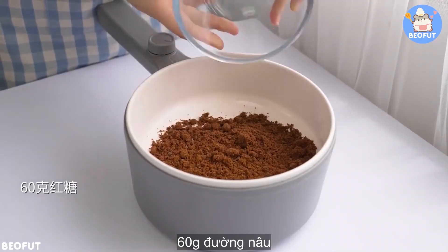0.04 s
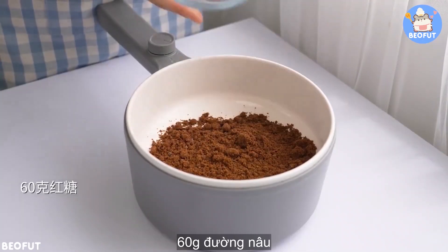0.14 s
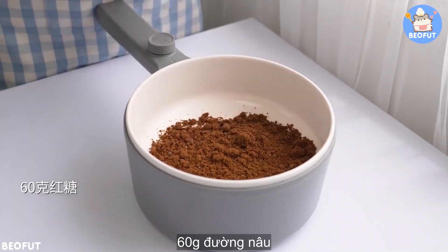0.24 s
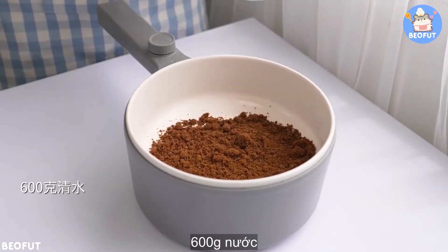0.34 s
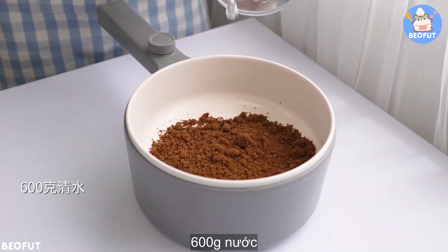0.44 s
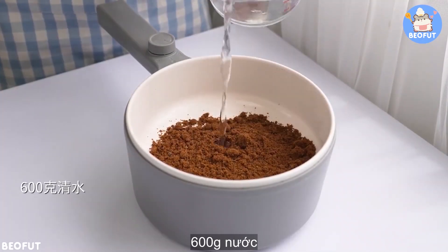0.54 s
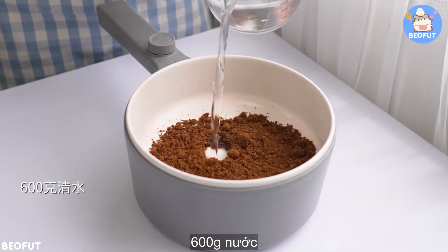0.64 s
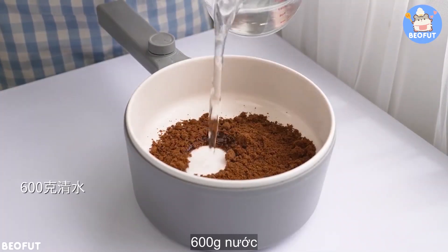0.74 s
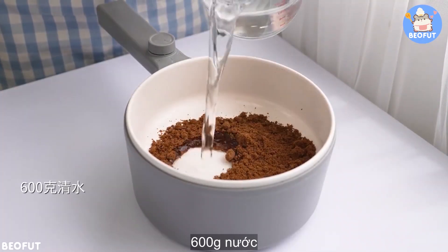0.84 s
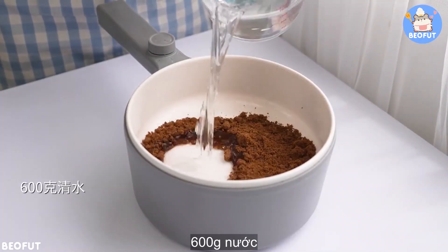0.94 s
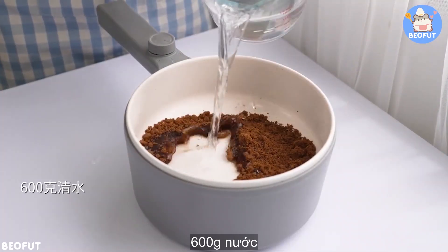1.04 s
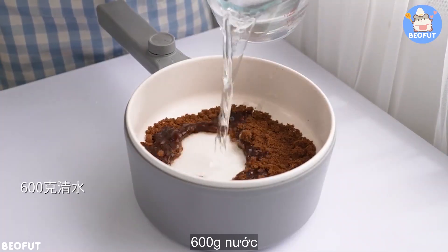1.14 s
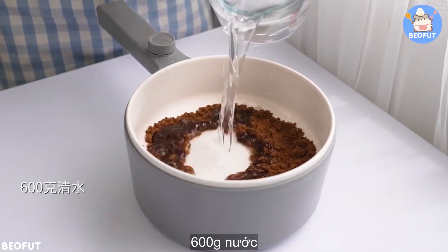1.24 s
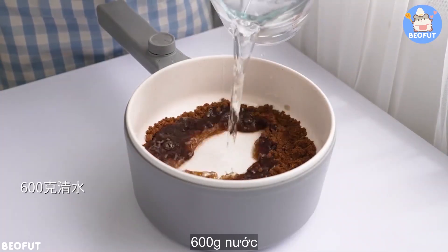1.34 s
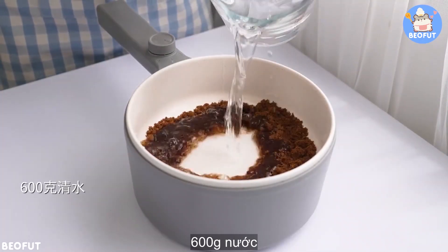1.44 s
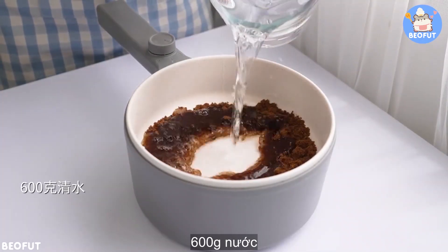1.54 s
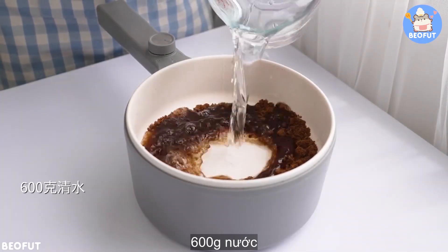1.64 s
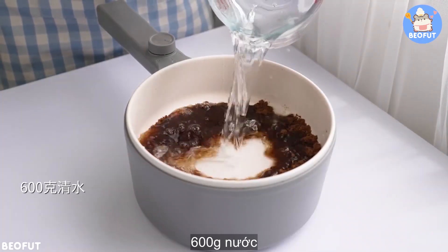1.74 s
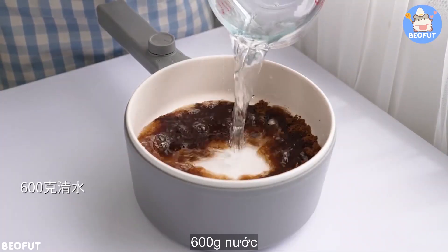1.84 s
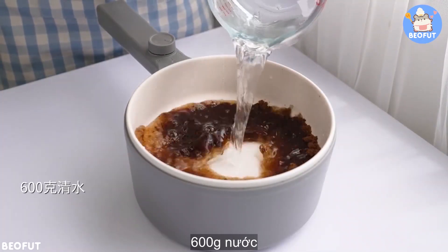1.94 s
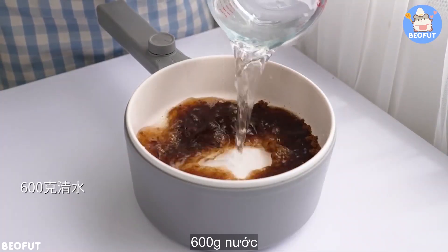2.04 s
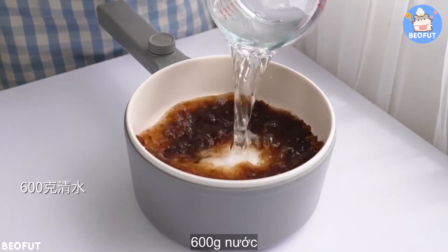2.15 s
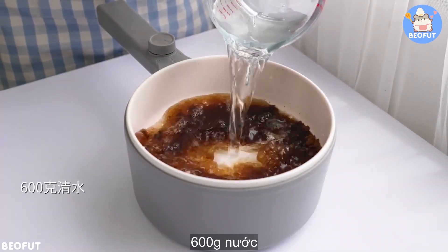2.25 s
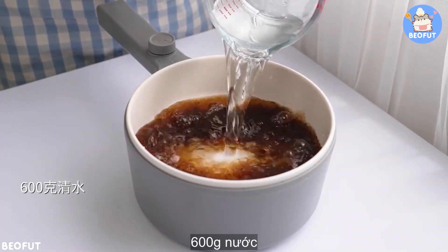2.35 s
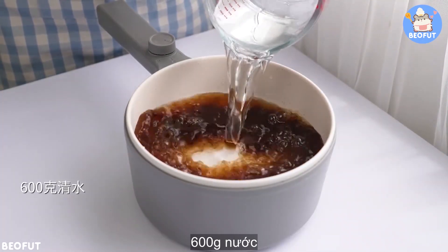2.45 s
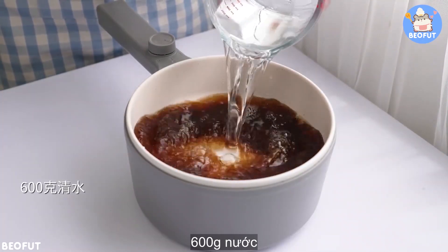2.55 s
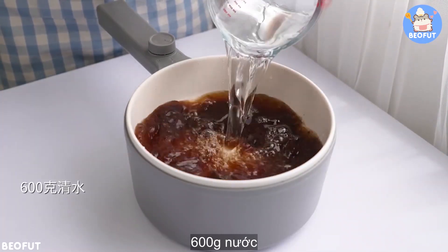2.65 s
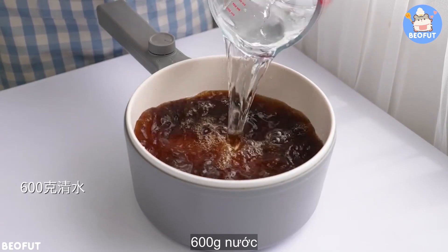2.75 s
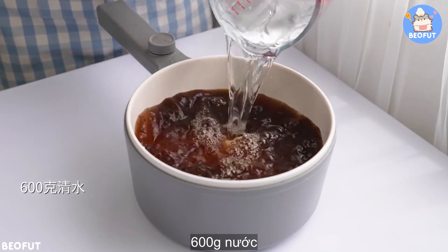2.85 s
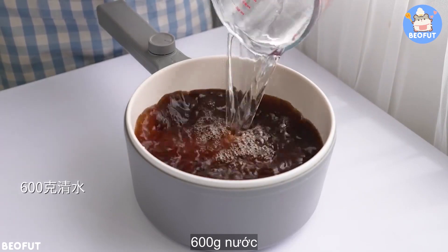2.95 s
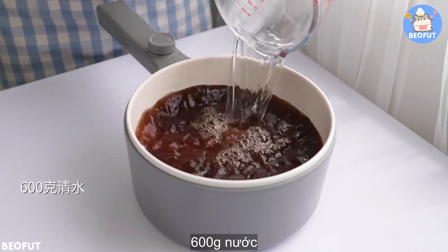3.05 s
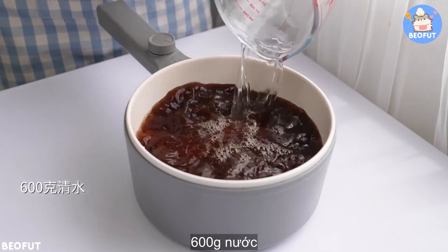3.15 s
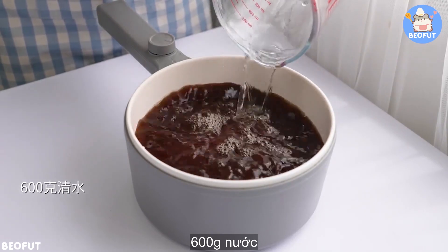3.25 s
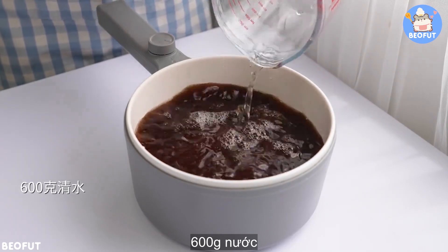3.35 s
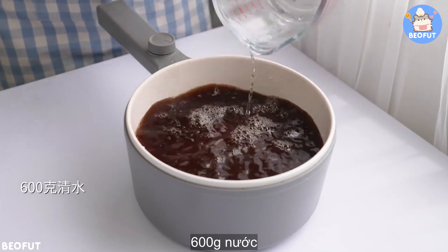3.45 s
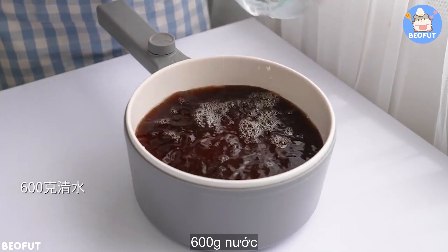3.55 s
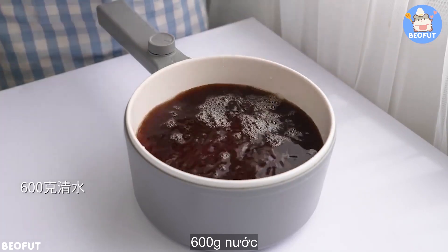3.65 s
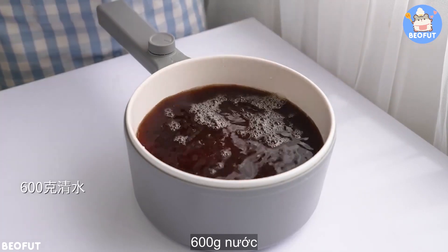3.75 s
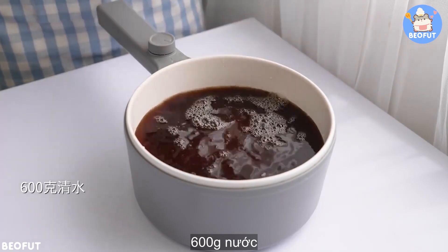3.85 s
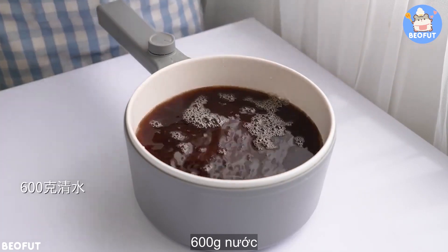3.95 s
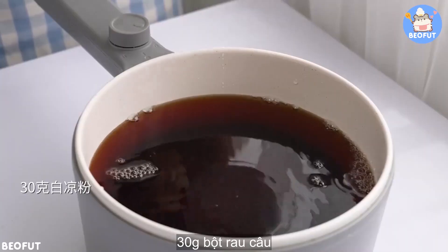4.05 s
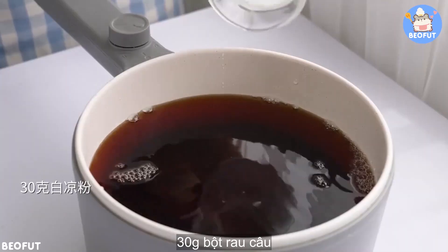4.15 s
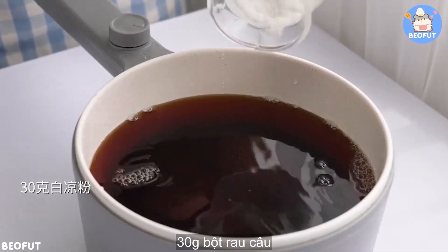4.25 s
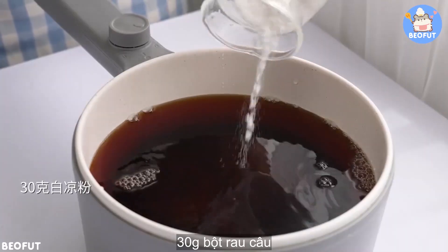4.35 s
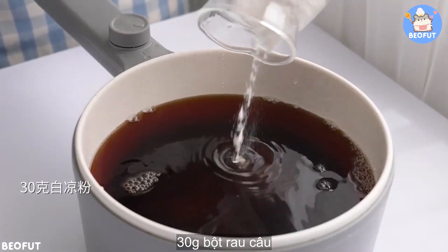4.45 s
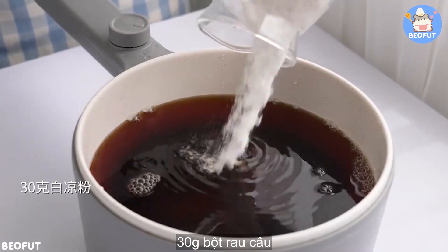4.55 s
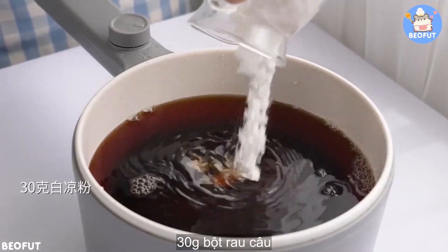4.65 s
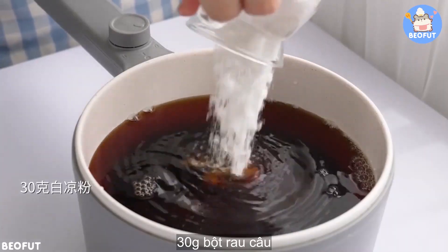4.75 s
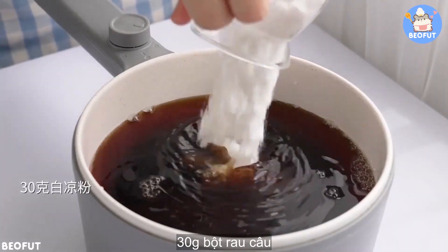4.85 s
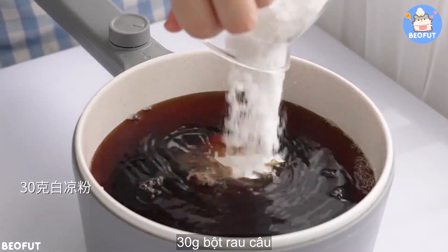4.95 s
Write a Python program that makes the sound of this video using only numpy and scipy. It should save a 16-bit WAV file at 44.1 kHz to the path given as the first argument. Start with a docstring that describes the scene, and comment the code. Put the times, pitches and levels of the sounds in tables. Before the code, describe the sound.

A close stereo scene in a small kitchen with short, hard reflections. At 0 s the last sugar slides into a saucepan: a dry, high, sandy hiss, brief and fading within about 0.3 s. Soft room air, a faint wavering hum and a thin electric whine fill the pause. Around 0.7 s a thin trickle of water begins, with small clicks and plips. From about 1.1 s it thickens, and between 1.3 and 2.7 s it is a full, bright, uneven pour: crackling spatter, fizz, gurgling froth, sharp plops and slaps, with a hard tick near 1.85 s and a soft low boom near 2.4 s. The pan's air rings slightly. The flow weakens towards 3.1 s, spurts again around 3.3 s, then breaks into soft dribbles ending by 3.75 s. Only room noise remains, turning duller and slightly fuller at about 4.1 s until the end at roughly 5 s.

```python
"""A short hiss of sugar sliding into a saucepan in a small kitchen; then water poured onto it from a jug.
Sugar and spatter are hails of tiny noise bursts; heavy drops are single noise slaps.
Bubbles are short sines rising in pitch: a fizz, a gurgling froth, large plops, last dribbles.
Pan air modes ring after the water; echoes and a diffuse tail make the kitchen.
Behind: soft airy noise, a wavering hum and thin electric whine, one low boom."""
import sys
import numpy as np
from scipy import signal
from scipy.fft import rfft, irfft, next_fast_len
from scipy.io import wavfile

SR = 44100
rng = np.random.default_rng(int(sys.argv[2]) if len(sys.argv) > 2 else 0)


def dump_mix(stems):
    """Bounce the given channels to the path in sys.argv[1] as a 16-bit WAV at rate SR."""
    frames = np.atleast_2d(stems).T  # one column per channel
    limited = np.clip(frames, -1, 1)  # hard clip at full scale
    pcm = np.round(limited * 32767).astype(np.int16)
    wavfile.write(sys.argv[1], SR, pcm)


N = 221107
TIME = np.arange(N) / SR
EDGE_HZ = 15750  # top of the band

# stream as the jug is emptied: start_s, relative spatter level_db, relative gurgle level_db
FLOW = [(.68, -57, -65), (.74, -42, -55), (.84, -45.5, -53), (.92, -37.5, -38.5), (1.06, -34, -87),
        (1.2, -29, -37), (1.32, -24, -20), (1.44, -23, -22), (1.58, -36, -39), (1.68, -25, -24),
        (1.85, -27.5, -35), (2.26, -28, -29.5), (2.34, -25.5, -24), (2.55, -26.5, -22.5),
        (2.72, -35, -26.5), (2.87, -43, -43), (3.09, -55, -45), (3.21, -35, -34), (3.37, -34.5, -35.5),
        (3.5, -44, -42.5), (3.66, -48, -49.5), (3.76, -50, -81)]
# spectrum of the spray: frequency_hz, relative density_db
SPRAY_SPECTRUM = [(300, -48), (1000, -10.5), (1400, -4), (3000, 0.5), (5000, 1), (6100, 0), (6700, -4),
                  (7800, -0.5), (10000, -1), (12500, -1.5), (15500, -1)]
# large bubbles: start_s, mid-length pitch_hz, peak_db before panning, length_s
PLOPS = [(.7669, 3190, -27.5, 0.0049), (0.9096, 4270, -27, 0.0021), (0.943, 4240, -27, .0035),
         (0.9515, 4100, -28.5, 0.004), (1.073, 2030, -31.5, 0.0043), (1.0977, 1372, -21.5, 0.0097),
         (1.1384, 2985, -18.5, 0.0064), (1.147, 3970, -15, 0.0073), (1.218, 1323, -33, .012),
         (1.2355, 1382, -24.5, 0.022), (1.277, 2580, -21.5, 0.0054), (1.2945, 2904, -15.5, 0.0084),
         (1.2969, 1526, -18, 0.0094), (1.3057, 2540, -12.5, 0.0051), (1.35, 1397, -12, 0.01),
         (1.382, 2187, -8.5, 0.0025), (1.3847, 1580, -8.5, 0.0046), (1.4354, 2660, -7, 0.0079),
         (1.5036, 1397, -8, 0.0092), (1.511, 693, -23.5, .019), (1.606, 1994, -27, 0.0069),
         (1.624, 2670, -22.5, 0.0048), (1.633, 3140, -20.5, 0.0081), (1.6668, 1490, -12.5, 0.0046),
         (1.676, 730, -25.5, 0.019), (1.6918, 826, -31.5, 0.015), (1.784, 5850, -14.5, 0.0052),
         (1.8136, 2272, -4.5, 0.0031), (1.847, 3180, -14, 0.0047), (1.9036, 3550, -13.5, 0.0064),
         (1.9039, 2118, -19, 0.012), (1.9371, 2090, -18, 0.0071), (1.9646, 2220, -20, 0.0054),
         (2.002, 1345, -27, 0.01), (2.066, 4350, -20, 0.0096), (2.1164, 5600, -13.5, 0.0035),
         (2.144, 1387, -20.5, 0.0065), (2.162, 1435, -28.5, 0.018), (2.193, 3310, -13.5, 0.0023),
         (2.3062, 1760, -10, 0.0032), (2.313, 1432, -22.5, 0.022), (2.3627, 1116, -23.5, 0.011),
         (2.385, 1373, -6.5, 0.011), (2.42, 3070, -17, 0.0052), (2.4471, 3440, -8.5, 0.0053),
         (2.4834, 2140, -20.5, 0.0068), (2.512, 2100, -19.5, 0.0042), (2.5715, 2150, -12.5, 0.0047),
         (2.5841, 4000, -18, 0.0056), (2.631, 2070, -24, 0.016), (2.682, 2695, -18.5, 0.0088),
         (2.7073, 2780, -25, 0.0059), (2.787, 820, -35.5, 0.014), (3.1017, 5450, -15, 0.0024),
         (3.1385, 3550, -23, 0.0029), (3.161, 1560, -26.5, 0.003), (3.1815, 1550, -30, 0.0046),
         (3.239, 2000, -30.5, 0.0054), (3.32, 3480, -20.5, 0.0039), (3.3938, 4120, -17.5, 0.0027),
         (3.433, 4600, -26.5, 0.0037), (3.471, 4700, -30, .003), (3.5756, 2030, -30.5, 0.0028),
         (3.5803, 3420, -22, 0.0042), (3.623, 1340, -31.5, 0.0056), (3.6472, 1493, -29, 0.0089)]
# how well bubbles sound out of the pan: frequency_hz, relative gain_db
POOL_GAIN = [(900, -36.5), (1130, -4), (1300, -1.5), (1450, -4), (1750, -21), (2100, 4.5), (2450, 6),
             (2700, 2), (3000, 2), (3450, 9), (3900, 0), (6000, 10)]


def amp(db):
    """Decibels to gain."""
    return 10 ** (np.asarray(db) / 20)


def unit(x):
    """Scales to rms 1."""
    return x / np.sqrt(np.mean(x ** 2) + 1e-20)


def curve(rows, axis=1):
    """One column of a time table, interpolated at every sample."""
    rows = np.asarray(rows)
    return np.interp(TIME, rows[:, 0], rows[:, axis])


def read(points, hz):
    """Interpolates a spectrum table on a log-frequency axis."""
    table_hz, value = np.transpose(points)
    return np.interp(np.log(hz + 1), np.log(table_hz + 1), value)


def colour(x, points):
    """Filters by a spectrum table; white noise keeps its power."""
    size = next_fast_len(N, real=True)
    gain = unit(amp(read(points, np.fft.rfftfreq(size, 1 / SR))))
    return irfft(rfft(x, size) * gain, size)[..., :N]


def sides(balance_db):
    """Left and right gains for a level difference; positive leans left."""
    return amp(np.array([[balance_db], [-balance_db]]) / 2)


def partly_alike(a, b, likeness):
    """Left and right from two independent signals, correlated by likeness."""
    same = np.clip(likeness, -1, 1)
    return np.array([a, same * a + np.sqrt(1 - same ** 2) * b])


def add(mix, start_s, sound):
    """Adds a sound to the mix at start_s."""
    part = mix[:, max(round(start_s * SR), 0):][:, :sound.shape[-1]]
    part += sound[..., :part.shape[1]]


def crackle(per_s, spread_db, decay_s):
    """Hail of tiny random impacts, each a decaying noise burst; rms 1."""
    hit = rng.random(N) < per_s / SR
    size = amp(spread_db * np.minimum(rng.exponential(1, N), 3.5)) * hit
    power = signal.lfilter([1], [1, -np.exp(-2 / (decay_s * SR))], size ** 2)
    return unit(np.sqrt(power) * rng.standard_normal(N))


def blip(hz, length_s, lag_s, rise=0.082, swell=1.0, fade=0.79):
    """One bubble in stereo: swells, climbs in pitch nearing the surface, stops when it bursts."""
    u = np.linspace(0, 1, max(int(length_s * SR), 16))
    shape = u ** abs(swell) * (1 - u) ** abs(fade)
    climb = rise * (u * u - u) / 2
    seconds = length_s * (u + climb) + np.array([[0], [lag_s]])
    return shape / shape.max() * np.sin(2 * np.pi * hz * seconds)


def sugar(side=0.7, balance_db=-2.0, spread_db=0.0):
    """Countless crystals skitter over a hard, smooth surface, a little differently at each side."""
    # grain spectrum: frequency_hz, relative density_db
    grain_spectrum = [(2000, -41), (5900, -35), (6300, -22.5), (7000, -13.5), (8200, -7.5), (8700, -11),
                      (9400, -4.5), (11500, -9.5), (13000, -19), (15000, -26)]
    # clumps sliding in: start_s, level_db, fade_s (time to fall by fade_db)
    slides = [(0, -37, 0.079), (0.048, -24, 0.28), (0.056, -17, 0.03)]
    rise_s, fade_db, bend = 0.0018, -49.5, 1.63  # bend > 1: dies ever faster
    middle, left, right = (crackle(per_s=7000, spread_db=spread_db, decay_s=.0005) for _ in range(3))
    grains = unit(middle + side * np.array([left, right]))
    power = np.zeros(N)
    for start_s, level_db, fade_s in slides:
        t = np.maximum(TIME - start_s, 0)
        fall_db = fade_db * np.minimum(t / fade_s, 2) ** bend
        power += (np.minimum(t / rise_s, 1) * amp(level_db + fall_db)) ** 2
    return colour(grains, grain_spectrum) * np.sqrt(power) * sides(balance_db)


def kitchen(x, wet_db=-7.0, echo_db=-2.5, build_s=0.0017):
    """Close echoes, then a diffuse tail; decay and left-right likeness vary with frequency."""
    # tail decay: frequency_hz, t60_s
    decay_times = [(300, 0.34), (1400, 0.29), (4000, 0.18), (9000, 0.28), (16000, 0.031)]
    # tail correlation: frequency_hz, left-right likeness
    tail_likeness = [(300, 0.024), (700, 0.84), (1400, 0.38), (2800, 0), (16000, 0.92)]
    # pan wall and table: delay_s, relative left gain, relative right gain
    early_echoes = [(.0014, -0.028, 0.16), (.0031, 0.45, -0.077), (.0046, 0.046, 0.33), (.0085, 0.32, 0.26),
                    (.016, .12, .1), (0.0234, -0.037, -0.016)]
    hz, t, (a, b) = signal.stft(rng.standard_normal((2, SR // 2)), SR, nperseg=256)
    spectrogram = partly_alike(a, b, read(tail_likeness, hz)[:, None])
    decay = np.exp(-np.log(1000) * t / read(decay_times, hz)[:, None])
    build = 1 - np.exp(-t / build_s)
    tail = signal.istft(spectrogram * decay * build, SR, nperseg=256)[1]
    response = tail / np.linalg.norm(tail[0]) * amp(wet_db)
    for delay_s, left, right in early_echoes:
        add(response, delay_s, amp(echo_db) * np.array([[left], [right]]))
    return signal.fftconvolve(x, response, axes=1)[:, :N]


def air(spectrum, gain):
    """Airy room noise: alike on both sides in the bass and top treble, mostly unlike between."""
    # frequency_hz, left-right likeness
    air_likeness = [(60, 1), (180, 1), (550, 0.84), (1650, 0.04), (4970, 0.16), (15000, 1)]
    a, b = rfft(rng.standard_normal((2, N)))
    pair = irfft(partly_alike(a, b, read(air_likeness, np.fft.rfftfreq(N, 1 / SR))), N)
    return colour(pair, spectrum) * gain


def whine(drift_rad=.2):
    """Low hum and an appliance's thin whine: sines slowly wavering in level and phase."""
    # tone_hz, nominal rms_db, waver (relative level deviation)
    tones = [(56.3, -77, 0.6), (112, -80, .5), (195, -76.5, 1), (6420, -66, 0.4), (7200, -74.5, .1)]
    knots_s = np.linspace(0, N / SR, 40)
    out = np.zeros(N)
    for hz, rms_db, waver in tones:
        size, phase = (np.interp(TIME, knots_s, row) for row in rng.standard_normal((2, len(knots_s))))
        level = np.sqrt(2) * amp(rms_db) * (1 + waver * size)
        out += level * np.sin(2 * np.pi * hz * TIME + drift_rad * phase)
    return out


def background(early_balance_db=-1.0, late_balance_db=-1.5):
    """Hum and whine; room noise, softer around 1.6 s, crossfades to a duller noise near the end."""
    # noise before the crossfade: frequency_hz, relative density_db
    early_spectrum = [(15, -49), (25, -14), (91, -4), (204, -10.5), (297, -12), (399, -8.5), (433, -4),
                      (523, -6), (1020, 2.5), (1450, -6.5), (1620, -2.5), (2560, -11.5), (5280, -20.5),
                      (6550, -17), (15500, -28)]
    # noise after the crossfade: frequency_hz, relative density_db
    late_spectrum = [(15, -57), (25, -27), (43, -9.5), (82, -14), (113, -8), (368, -19), (421, -11),
                     (666, -10), (1020, -0.5), (2010, -13), (3340, -24.5), (6050, -30), (6550, -27),
                     (10100, -35.5), (15500, -39)]
    early_db, late_db, change_s, crossfade_s = -49, -46, 4.13, 0.093
    max_dip_db, dip_s, dip_width_s = -6, 1.58, 0.8
    late = np.clip((TIME - change_s) / crossfade_s + .5, 0, 1)
    dip_db = max_dip_db * np.exp(-((TIME - dip_s) / dip_width_s) ** 2)
    before = air(early_spectrum, amp(early_db + dip_db) * np.sqrt(1 - late))
    after = air(late_spectrum, amp(late_db) * np.sqrt(late))
    return (before + whine()) * sides(early_balance_db) + after * sides(late_balance_db)


def flowing():
    """1 while water falls, 0 before and after, with short ramps."""
    return np.interp(TIME, [.68, .73, 3.64, 3.76], [0, 1, 1, 0])


def flow_db():
    """Relative spatter level: tilt of the jug, plus a quick swell for each lump of water."""
    # thicker lumps in the stream: start_s, extra level_db at the swell's peak
    gushes = [(1.2, 6.5), (1.739, 6.5), (2.0, 2), (2.109, 7.5), (3.31, 11)]
    gush_rise_s = 0.0085
    level_db = curve(FLOW)
    for start_s, extra_db in gushes:
        u = np.maximum(TIME - start_s, 0) / gush_rise_s
        level_db = level_db + extra_db * u * np.exp(1 - u)
    return level_db


def spatter(level_db=-5.5, spread=0.16):
    """The stream breaks into droplets, in the middle of the pan and to both sides."""
    middle, left, right = (crackle(per_s=1000, spread_db=2.0, decay_s=0.0017) for _ in range(3))
    spray = colour(unit(middle + spread * np.array([left, right])), SPRAY_SPECTRUM)
    return spray * amp(flow_db() + level_db) * flowing() * sides(0.2)


def fizz(level_db=-5.0, per_s=3200, size_db=5.0, cycles=17, low_hz=3800, scatter_db=8.0,
         phase_spread_rad=0.23, count=120):
    """Swarms of the tiniest bubbles: short high blips, each pitch from its own spot."""
    out = np.zeros((2, N + SR // 10))
    for hz in np.geomspace(low_hz, EDGE_HZ, count):
        life, place, spot = np.clip(rng.standard_normal(3), -2, 2)
        lag_s = phase_spread_rad * spot / (2 * np.pi * hz)
        ring = blip(hz, cycles / hz * np.exp(0.9 * life), lag_s, swell=0.21, fade=0.46)
        ring = ring * sides(scatter_db * place - 5.0)
        when, chance, strength = rng.random(size=(3, 300))
        born = chance * len(chance) < per_s / count * N / SR
        starts = (when[born] * N).astype(int)
        # a few are much louder
        size = amp(size_db * np.minimum(-np.log(strength[born]), 3.5)) * np.sqrt(hz / low_hz)
        for start, gain in zip(starts, size):
            out[:, start:start + ring.shape[1]] += gain * ring
    # differencing lifts the treble: the higher blips are made stronger
    bright = out[:, :N] - 1.04 * np.roll(out[:, :N], 1, axis=1)
    return unit(colour(bright, SPRAY_SPECTRUM)) * amp(flow_db() + level_db) * flowing()


def froth(level_db=-5.0, size_db=7.5, cycles=14, scatter_db=14.0, lag_s=.00003, count=2600):
    """Small bubbles churned in by the stream; the smaller, the higher and shorter."""
    # a stream stronger than thin_db traps larger, lower and more varied bubbles
    thin_db, thin_hz, thin_spread_oct = -42, 3521, .12
    deepen_oct_per_db, widen_oct_per_db = .034, .022
    # the last spill falls in broken drops, which trap smaller bubbles than a whole stream as loud
    broken_s, broken_share = 3.1, .35
    out, gurgle_db = np.zeros((2, N)), curve(FLOW, axis=2)
    times_s = np.linspace(FLOW[0][0], FLOW[-1][0], count)
    draws = np.clip(rng.standard_normal((count, 6)), -2, 2)
    for s, (late, tone, size, life, place, spot) in zip(times_s, draws):
        force_db = max(gurgle_db[int(s * SR)] - thin_db, 0)
        deeper_oct = deepen_oct_per_db * force_db * (broken_share if s > broken_s else 1)
        spread_oct = thin_spread_oct + widen_oct_per_db * force_db
        hz = thin_hz * 2 ** (spread_oct * tone - deeper_oct)
        length_s = cycles / hz * np.exp(0.26 * life)
        gain = amp(size_db * size + read(POOL_GAIN, hz)) / np.sqrt(length_s)
        pan = unit(sides(scatter_db * place - 2.5))
        add(out, s + .006 * late, blip(hz, length_s, lag_s * spot, swell=0.63) * gain * pan)
    out = unit(out) * np.sqrt((times_s[-1] - times_s[0]) * SR / N)  # rms 1 over the pour
    return out * amp(gurgle_db + level_db) * flowing()


def shed(cycles=15, size_db=1.0, scatter_db=4.5, lag_s=.00003, count=5):
    """Gurgle around each large plop: weaker bubbles of nearby pitch, just before and after it."""
    shed_db, shift_oct, spread_oct, late_s, spread_s = -16, 0.12, 0.333, .008, .013
    out = np.zeros((2, N))
    draws = np.clip(rng.standard_normal((len(PLOPS), count, 5)), -2, 2)
    for (s, parent_hz, peak_db, _), cluster in zip(PLOPS, draws):
        for late, tone, size, place, spot in cluster:
            hz = parent_hz * 2 ** (shift_oct + spread_oct * tone)
            gain = amp(peak_db + shed_db + size_db * size + min(read(POOL_GAIN, hz), 0))
            bubble = blip(hz, cycles / hz, lag_s * spot) * gain
            add(out, s + late_s + spread_s * late, bubble * sides(scatter_db * place + 0.5))
    return out


def bubbles(level_db=0.0, lag_s=.00002, lean_db_per_oct=-1.4, centred_hz=1350, scatter_db=1.8):
    """Large separate plops, each from its own spot in the pool; higher ones tend to the right."""
    out = np.zeros((2, N))
    draws = rng.standard_normal((len(PLOPS), 2))
    for (s, hz, peak_db, length_s), (spot, place) in zip(PLOPS, draws):
        balance_db = lean_db_per_oct * np.log2(hz / centred_hz) + scatter_db * place
        add(out, s, blip(hz, length_s, lag_s * spot) * amp(peak_db + level_db) * sides(balance_db))
    return out


def splats(level_db=-0.5, apart=1.0, octaves=0.69, lowest_hz=1250, balance_db=-2.5, scatter_db=0.0):
    """Heavy drops slap the pan or pool: band-shaped noise that dies within milliseconds."""
    # start_s, relative initial level_db, spectral peak_hz, decay_s
    drops = [(.7673, -32, 3180, 0.0042), (0.79, -33, 3550, 0.0028), (0.9066, -25.5, 4380, 0.0038),
             (.922, -34, 5100, .0025), (0.9542, -27, 4500, .002), (1.1156, -14.5, 7600, 0.0022),
             (1.149, -9, 6800, 0.0019), (1.1968, -20.5, 8650, 0.0056), (1.215, -15, 7240, 0.0048),
             (1.234, -21, 4300, .0057), (1.2936, -16, 2900, 0.0039), (1.417, -13, 8100, 0.0052),
             (1.4392, -8, 2940, 0.0032), (1.5268, -16, 7300, 0.0028), (1.6237, -22.5, 3870, .003),
             (1.665, -17.5, 3670, 0.0039), (1.7273, -19.5, 6960, 0.0075), (1.766, -28, 10700, .003),
             (1.8492, -6, 7020, 0.00096), (1.8615, -17.5, 8200, 0.004), (2.0087, -18, 8600, .005),
             (2.017, -21, 9200, 0.01), (2.117, -20, 5600, .004), (2.3216, -14, 6850, 0.0027),
             (2.3708, -15, 9100, 0.0032), (2.3817, -13.5, 6600, 0.004), (2.414, -11, 4280, 0.0015),
             (2.4825, -11.5, 4040, .0014), (2.642, -16, 9900, 0.00096), (2.8203, -24, 12400, 0.0026),
             (3.1155, -39, 5100, 0.0037), (3.2096, -21.5, 6700, 0.002), (3.2746, -25.5, 5600, 0.0035),
             (3.3152, -11.5, 9700, 0.0027), (3.358, -21, 7140, .0034), (3.405, -26, 4070, .003),
             (3.587, -26.5, 4730, 0.0014), (3.6224, -34, 5100, .0024)]
    out, t = np.zeros((2, N)), np.arange(2048) / SR
    hz = np.fft.rfftfreq(len(t), 1 / SR) + 1
    for s, drop_db, peak_hz, decay_s in drops:
        noise, place = rng.standard_normal((3, len(t))), rng.standard_normal()
        hump = 1 / (1 + (np.log2(hz / peak_hz) / octaves) ** 2)
        slap = unit(irfft(rfft(noise[0] + apart * noise[1:]) * hump))
        pan = sides(balance_db + scatter_db * place)
        add(out, s, slap * np.exp(-t / decay_s) * amp(drop_db + level_db) * pan)
    no_bass = signal.butter(4, lowest_hz, "high", fs=SR, output="sos")
    return signal.sosfilt(no_bass, out)


def pan_ring(x):
    """Air in the pan rings on where the water meets one of its modes, alike on both sides."""
    # mode_hz, t60_s, relative gain_db
    air_modes = [(660, 0.17, 4), (752, 0.14, -4.5), (1240, 0.14, -17.5), (1453, 0.23, -10),
                 (2019, 0.037, 1.5), (2540, .08, -13.5), (2640, .08, -24.5), (3470, 0.1, -8)]
    t = np.arange(SR // 3) / SR
    response = np.zeros(len(t))
    for hz, t60_s, gain_db in air_modes:
        decay_per_s = np.log(1000) / t60_s
        gain = amp(gain_db) * 2 * decay_per_s / SR
        response += gain * np.exp(-decay_per_s * t) * np.cos(2 * np.pi * hz * t)
    return signal.fftconvolve(x.mean(0), response)[:N]


def knock(start_s=1.8493, peak_db=-20.0, decay_s=0.00013):
    """Dry tick of one hard slap: a one-sided decaying pulse that reaches down into the bass."""
    t = TIME - start_s
    return amp(peak_db) * (t >= 0) * np.exp(-abs(t) / decay_s)


def thud(start_s=2.375):
    """Low, soft boom: a sine that swells and dies."""
    # pitch_hz, peak_db, rise_s
    boom = (51, -43.5, 0.056)
    hz, peak_db, rise_s = boom
    u = np.maximum(TIME - start_s, 0) / rise_s
    return amp(peak_db) * (u * np.exp(1 - u)) ** 2 * np.sin(2 * np.pi * hz * TIME)


def dribbles(cycles=11, size_db=4.0, balance_db=-4.0, scatter_db=5.0, lag_s=.00003, count=18):
    """Last drops leave the lip at an uneven pace; each traps one soft, low bubble in the deep pool."""
    first_s, last_s = 3.17, 3.64
    centre_hz, spread_oct, level_db = 1696, 0.22, -36.5
    out = np.zeros((2, N))
    draws = np.clip(rng.standard_normal((count, 5)), -2, 2)
    for s, (late, tone, size, place, spot) in zip(np.linspace(first_s, last_s, count), draws):
        hz = centre_hz * 2 ** (spread_oct * tone)
        plink = blip(hz, cycles / hz, lag_s * spot) * amp(level_db + size_db * size)
        add(out, s + 0.013 * late, plink * sides(balance_db + scatter_db * place))
    return out


def scene():
    """Sugar, water and pan ring sound into the kitchen, over boom, tick and background."""
    water = spatter() + fizz() + splats() + froth() + bubbles() + shed() + dribbles()
    near = water + pan_ring(water) + sugar()
    return near + kitchen(near) + thud() + knock() + background()


def record(dry):
    """Clips peaks at full scale, then limits the band."""
    lowpass = signal.firwin(301, EDGE_HZ, window=("kaiser", 8), fs=SR)
    return signal.oaconvolve(np.clip(dry, -1, 1), lowpass[None], "same")


dry = scene()
out = record(dry)
dump_mix(out)
```